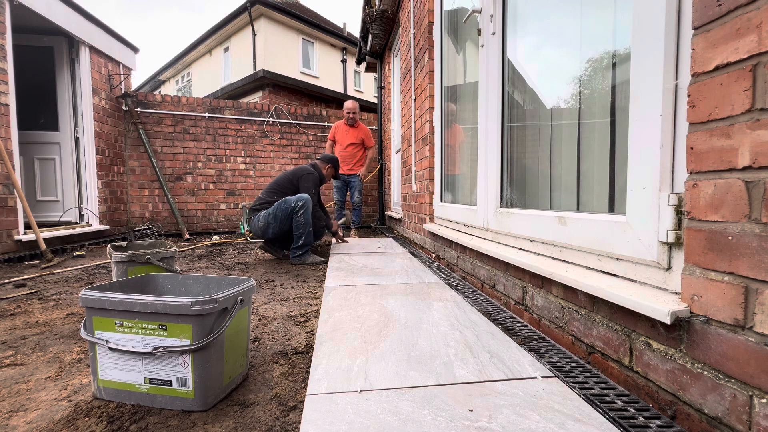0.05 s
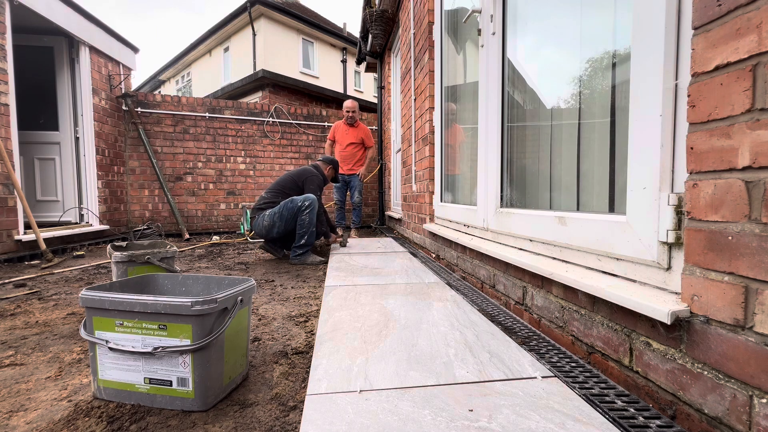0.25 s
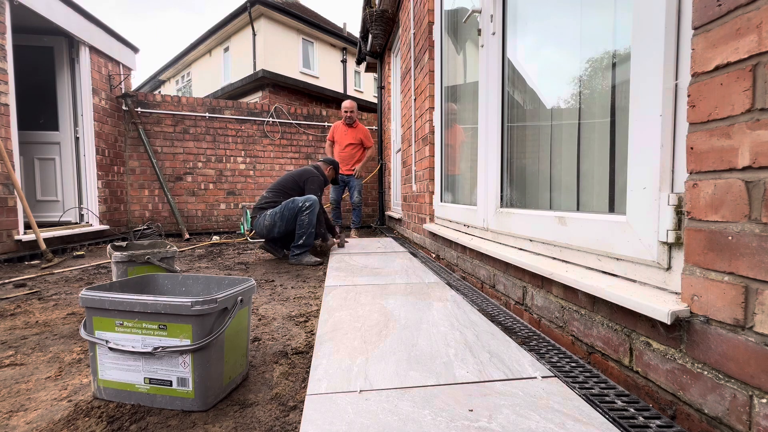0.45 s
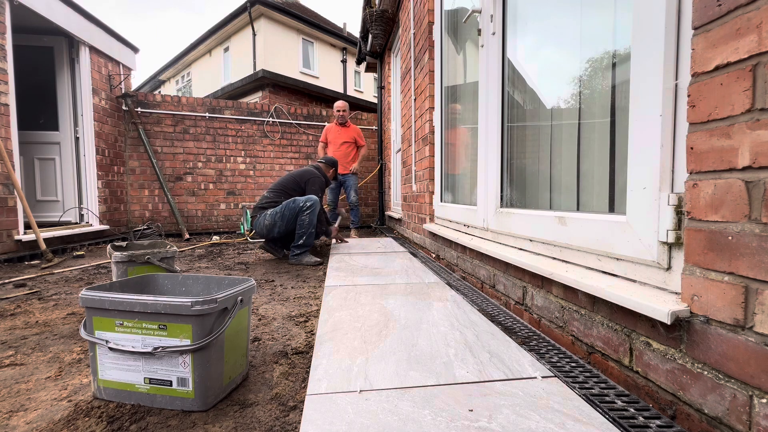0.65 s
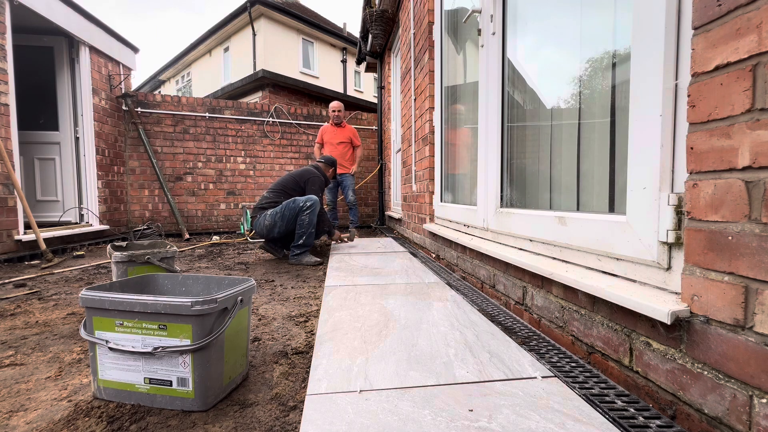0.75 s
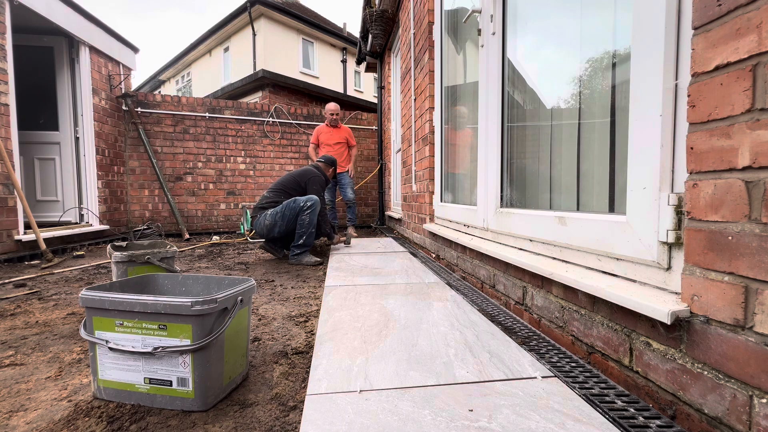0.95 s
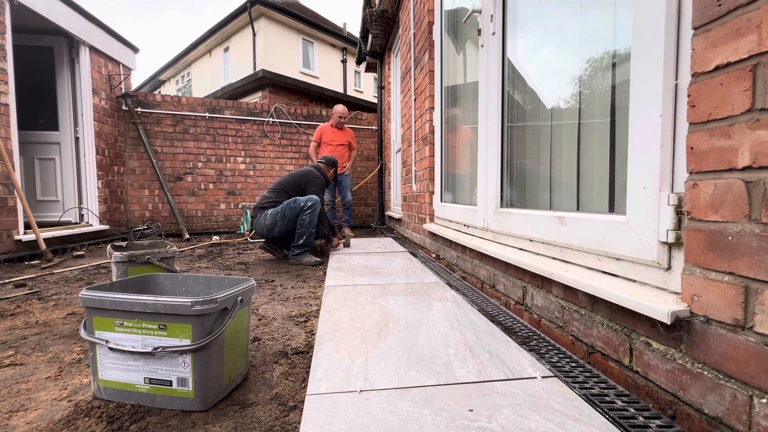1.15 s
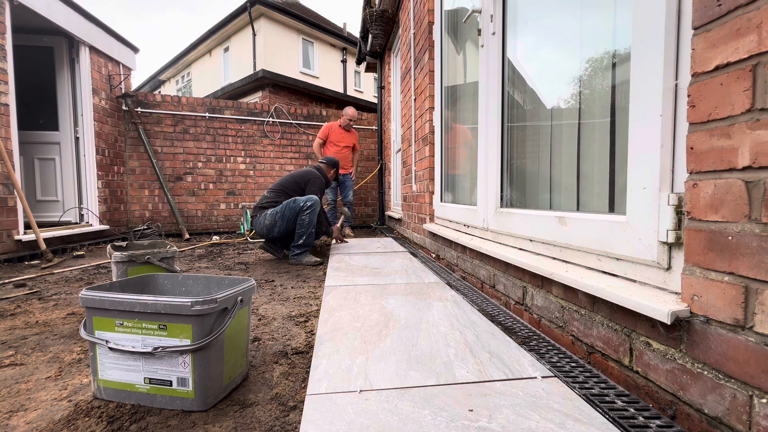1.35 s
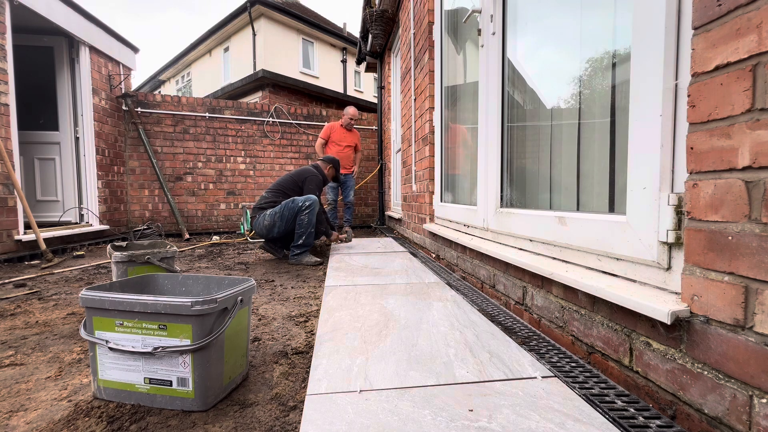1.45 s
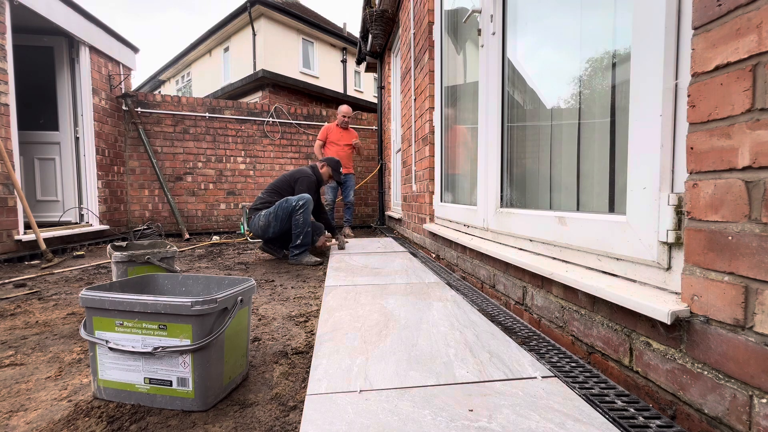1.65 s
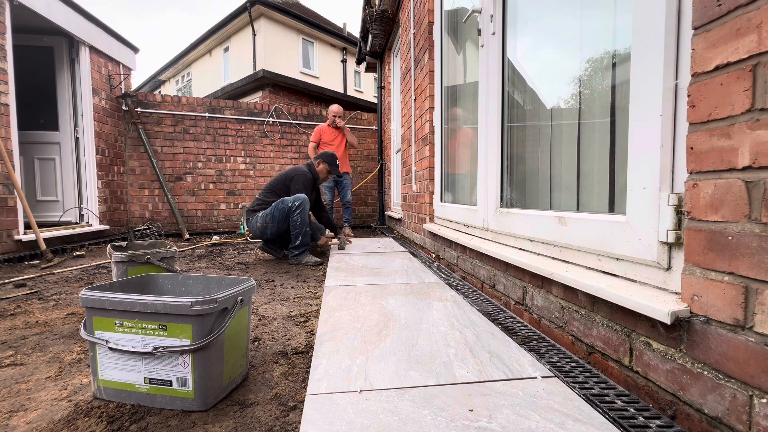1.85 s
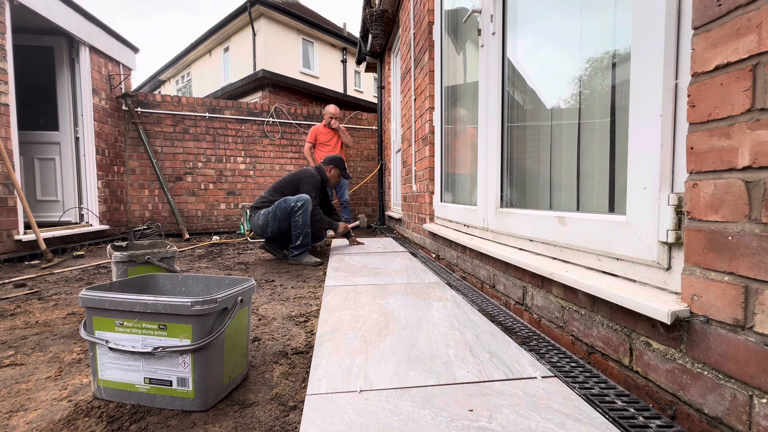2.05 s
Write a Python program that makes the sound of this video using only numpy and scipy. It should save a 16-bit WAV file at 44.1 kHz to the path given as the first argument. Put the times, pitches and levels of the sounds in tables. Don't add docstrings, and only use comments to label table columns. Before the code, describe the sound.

A rubber mallet strikes a large paving tile with dull, snappy knocks at about 0.22, 0.45, 0.69, 0.92, 1.15 and 1.37 seconds, then a soft touch at 1.64. Each has a short ring, low boom and quick wall echoes, slightly right. Grit scrapes faintly near 0.33, 0.62 and 1.86. Quiet town hush and machine hum persist, hum peaking near 1.74; a distant blackbird whistles from 1.8.

```python
import sys
import numpy as np
from scipy import signal
from scipy.fft import rfft, irfft, next_fast_len
from scipy.io import wavfile
from scipy.ndimage import uniform_filter1d, map_coordinates

SR = 44100
rng = np.random.default_rng(int(sys.argv[2]) if len(sys.argv) > 2 else 0)


def amplitude_ratio(level_db):
    exponent = np.asarray(level_db, float) / 20
    return 10 ** exponent


def inscribe(sig):
    pcm = np.round(np.clip(np.atleast_2d(sig).T, -1, 1) * 32767)
    wavfile.write(sys.argv[1], SR, pcm.astype(np.int16))


N = 92610
BLOW_TIME_S = np.arange(SR // 2) / SR


def unit(x):
    return x / np.sqrt(np.mean(x ** 2) + 1e-20)


def along(points, hz):
    point_hz, value = np.transpose(points)
    return np.interp(np.log(hz + 1), np.log(point_hz + 1), value)


def filtered(x, response):
    size = next_fast_len(x.shape[-1] + 8192)
    spectrum = rfft(x, size) * response(np.fft.rfftfreq(size, 1 / SR))
    return irfft(spectrum, size)[..., :x.shape[-1]]


def noise(colour, shape):
    return unit(filtered(rng.standard_normal(shape), lambda hz: amplitude_ratio(along(colour, hz))))


def wobble(rate):
    points = rng.standard_normal(int(N * rate / SR) + 4)
    return map_coordinates(points, [np.arange(N) * rate / SR])


def add(track, start_s, x):
    part = track[..., round(start_s * SR):][..., :x.shape[-1]]
    part += x[..., :part.shape[-1]]


def sides(table, lag_s, hz):
    half = amplitude_ratio(along(table, hz) / 2) * np.exp(1j * np.pi * hz * lag_s)
    return np.array([half, 1 / half])


def yard_tail(colour):
    # pitch_hz, fade_s
    fade_times = [(60, 0.61), (160, 0.39), (420, 0.12), (1100, 0.22), (2900, 0.23), (7700, 0.15),
                  (15000, 0.18)]
    alike, start_s = 0.2, 0.0083
    common, left, right = rng.standard_normal((3, SR // 2))
    pair = np.sqrt(alike) * common + np.sqrt(1 - alike) * np.array([left, right])
    hz, t, z = signal.stft(pair, SR, nperseg=256)
    level_db = colour(hz)[:, None] - 60 * t / along(fade_times, hz)[:, None]
    tail = signal.istft(z * amplitude_ratio(level_db), SR, nperseg=256)[1][:, :SR // 2]
    return tail * (1 - np.exp(-BLOW_TIME_S / start_s))


def hush():
    # pitch_hz, level_db
    colour = [(15, -26), (40, -16), (120, -2), (300, -14), (500, -14.5), (720, -11), (1100, -18),
              (2100, -20.5), (4000, -33), (16000, -39.5)]
    # pitch_hz, likeness (-1 to 1)
    likeness = [(60, 0.63), (250, 0.27), (640, -0.24), (1500, 0.01)]
    z = signal.stft(rng.standard_normal((2, N)), nperseg=512)[2]
    patches = uniform_filter1d(rng.standard_normal(z.shape[1:]), size=6, axis=0)
    patches = uniform_filter1d(patches, size=10, axis=1)
    pair = signal.istft(z * amplitude_ratio(1.6 * unit(patches)), nperseg=512)[1][:, :N]

    def width(hz):
        turn = np.arccos(np.clip(along(likeness, hz), -1, 1)) / 2
        return amplitude_ratio(along(colour, hz)) * np.array([np.cos(turn), np.sin(turn)])

    mid, side = filtered(pair, width)
    return amplitude_ratio(-61.5) * unit(np.array([mid + side, mid - side]))


def machine_hum():
    # pitch_hz, level_db
    tones = [(307, -80), (614, -79), (676, -70), (737, -74), (1244, -86), (1475, -84)]
    # time_s, level_db
    load = [
        (0, -7),
        (.12, 0),
        (.5, 2),
        (1.5, -3.5),
        (1.68, 5.5),
        (1.74, 11.5),
        (1.8, 3.5),
        (1.85, 1),
        (2.1, 3),
    ]
    t = np.arange(N) / SR
    hum = np.zeros((2, N))
    for hz, db in tones:
        swell = amplitude_ratio(db + 6.5 + 2 * wobble(7.47))
        phase = 0.5 * wobble(10) + [[0], [2.2]]
        hum += swell * np.sin(2 * np.pi * hz * t + phase)
    return hum * amplitude_ratio(np.interp(t, *np.transpose(load)))


def air():
    # pitch_hz, level_db
    balance = [(60, -11), (180, -11.5), (550, -5), (1650, -3), (4970, -3), (15000, 0)]
    return filtered(hush() + machine_hum(), lambda hz: sides(balance, 0, hz))


def bird():
    # start_s, length_s, from_hz, to_hz, level_db
    whistles = [
        (1.812, .05, 2110, 2050, -69),
        (1.89, .045, 1890, 2000, -68),
        (1.96, .04, 1760, 1680, -71),
        (2.0, .035, 1680, 1820, -72),
        (2.018, .05, 2020, 2190, -65),
        (2.058, .06, 2150, 2010, -64),
    ]
    song = np.zeros(N)
    for start_s, length_s, from_hz, to_hz, db in whistles:
        u = np.arange(round(length_s * SR)) / (length_s * SR)
        pitch_hz = from_hz + (to_hz - from_hz) * u + 25 * wobble(93)[:len(u)]
        whistle = np.sin(2 * np.pi * np.cumsum(pitch_hz) / SR)
        add(song, start_s, amplitude_ratio(db) * np.sin(np.pi * u) * whistle)
    tail = yard_tail(np.zeros_like)
    tail = tail / np.linalg.norm(tail[0])
    return song + amplitude_ratio(1) * signal.fftconvolve(song[None], tail, axes=1)[:, :N]


def grit():
    # start_s, level_db, rise_s, fade_s (to -60 dB), centre_hz
    puffs = [
        (0.038, -62, 0.0033, .04, 7000),
        (0.328, -57, .04, 0.42, 4670),
        (0.622, -53.5, 0.005, 0.14, 3120),
        (1.596, -63, 0.006, 0.13, 3900),
        (1.64, -76, 0.0048, 0.027, 4970),
        (1.862, -53, 0.0029, 0.058, 1270),
        (1.864, -69.5, 0.0034, .06, 5580),
    ]
    out, t = np.zeros((2, N)), np.arange(SR // 4) / SR
    for start_s, db, rise_s, fade_s, hz in puffs:
        colour = [(hz / 4, -18), (hz, 0), (hz * 2.3, -8), (20000, -30)]
        grains = noise(colour, (2, len(t))) * amplitude_ratio(wobble(386)[:len(t)])
        add(out, start_s, amplitude_ratio(db - 60 * t / fade_s) * (1 - np.exp(-t / rise_s)) * grains)
    return out


def ring(hz, db, fade_s, t, attack_s=0.0003, waver=0):
    t = np.maximum(t, 0)
    tone = np.sin(2 * np.pi * hz * t + waver)
    return amplitude_ratio(db - 60 * t / fade_s) * tone * (1 - np.exp(-t / attack_s))


def struck(modes, late_s):
    total = 0
    for hz, db, fade_s in modes:
        start_s = late_s + 0.0009 * np.sqrt(1000 / hz)
        total = total + ring(hz, db + 1.2 * rng.normal(), fade_s, BLOW_TIME_S - start_s)
    return total


def brightness(crack_db, hz):
    return crack_db * hz / (hz + 3000)


def walls(hz):
    # delay_s, left_db, right_db
    echoes = [
        (.0026, -25.5, -11.5),
        (.007, -15.5, -21.5),
        (.019, -15, -15.5),
    ]
    total = 1
    for delay_s, left_db, right_db in echoes:
        total = total + amplitude_ratio([[left_db], [right_db]]) * np.exp(-2j * np.pi * hz * delay_s)
    return total


def tile():
    # pitch_hz, level_db, fade_s (to -60 dB)
    tile_modes = [(154.2, -2.5, 0.11), (177.3, 2.5, 0.15), (197.2, -10, .07), (247.4, -3.5, 0.055),
                  (355.3, -6, 0.055), (417.4, -0.5, 0.046), (486.5, -18, 0.019), (543, 9, 0.052),
                  (584, -13.5, 0.1), (671.3, 9, 0.027), (877, -3.5, .05), (1022, -2.5, .06)]
    return amplitude_ratio(-10) * filtered(struck(tile_modes, 0.0014), walls)


def ping(crack_db):
    # pitch_hz, level_db, fade_s (to -60 dB)
    ping_modes = [(1000, 4.5, .026), (1340, -1, .018), (800, -4, .022), (2250, -10, .012), (2800, -13, .01)]
    pair = struck(ping_modes, np.array([[0.00029], [0]]))
    return filtered(pair, lambda hz: amplitude_ratio(brightness(crack_db, hz)))


def crack(crack_db):
    # pitch_hz, level_db
    colour = [(900, -50.5), (2000, -6.5), (2600, 1.5), (3400, -12), (4700, -4), (5400, -26), (6300, -5),
              (16400, -28.5)]
    rise_s, hold_s, fade_s, echo_s = 0.0008, 0.0015, 0.004, 0.0011
    t = BLOW_TIME_S
    shape = np.clip(t / rise_s, 0, 1) * amplitude_ratio(-60 * np.maximum(t - hold_s, 0) / fade_s)
    burst = amplitude_ratio(-7 + crack_db) * shape * noise(colour, len(t))
    return burst + np.array([[0], [1]]) * amplitude_ratio(-6) * np.roll(burst, round(echo_s * SR))


def booms(boom_db):
    # pitch_hz, level_db, fade_s (to -60 dB), start_s, extra_right_lag_s
    boom_modes = [(62, -23.5, 0.24, 0.0094, .003), (93.5, -14.5, 0.4, 0.0036, 0.0012),
                  (149.16, -12, 0.4, .004, 0.00022), (245.8, -9, 0.24, .003, 0.00033)]
    total = 0
    for hz, db, fade_s, start_s, lag_s in boom_modes:
        t = BLOW_TIME_S - start_s - lag_s * np.array([[0], [1]])
        waver = 0.45 * wobble(14)[:len(BLOW_TIME_S)]
        total = total + ring(hz, db + boom_db + rng.normal(), fade_s, t, 0.003, waver)
    return total


def wash(crack_db):
    # pitch_hz, level_db (per Hz)
    colour = [(120, -22), (200, -4), (424, -8.5), (558, -3.5), (3070, -34.5), (5230, -37), (9580, -37),
              (13800, -51.5), (16000, -94.5)]
    rms = np.sqrt(np.mean(amplitude_ratio(2 * along(colour, np.linspace(0, SR / 2, 500)))))
    tail = yard_tail(lambda hz: along(colour, hz) + 0.24 * brightness(crack_db, hz))
    return amplitude_ratio(-10) * tail / rms


def lead_in(crack_db, lead_s):
    # pitch_hz, level_db
    colour = [(50, -18.5), (150, -6), (600, -9.5), (1100, -0.5), (2300, -12.5), (3200, -15), (9000, -20.5),
              (16000, -39)]
    t, after_s = BLOW_TIME_S, 0.012
    hiss = filtered(noise(colour, (2, len(t))), lambda hz: amplitude_ratio(brightness(crack_db, hz)))
    swell = np.clip(t / lead_s, 0, 1) - np.clip((t - lead_s) / after_s, 0, 1)
    return amplitude_ratio(2) * np.sin(np.pi / 2 * swell) ** 1.15 * hiss


def mallet():
    # level_db, crack_db, boom_db
    blows = [
        (-8, -5.5, -4.5),
        (-8.5, 0.5, -0.5),
        (-9, 0, -0.5),
        (-8.5, -1, -1.5),
        (-9, -7, -3),
        (-8, -4.5, -1.5),
        (-23, -30.5, -2.5),
    ]
    blow_starts = [.2161, .4547, .6877, .9170, 1.1464, 1.3715, 1.6402]
    ping_levels = [-13, -11, -11, -10, -14, -9.5, -23]
    lead_in_levels = [-25, -31, -31, -33, -24, -36, -52]
    lead_in_times = [.025, .022, .022, .022, .029, .021, .006]
    # pitch_hz, level_db
    balance = [(40, -6), (90, -4.5), (200, -9), (400, -9), (700, -6), (1200, 0), (2500, -1.5), (9000, -4)]
    out = np.zeros((2, N))
    each_blow = zip(blow_starts, ping_levels, lead_in_levels, lead_in_times, blows)
    for start_s, ping_db, lead_in_db, lead_s, (db, crack_db, boom_db) in each_blow:
        body = tile() + crack(crack_db) + booms(boom_db) + wash(crack_db)
        add(out, start_s, amplitude_ratio(db) * body + amplitude_ratio(ping_db) * ping(crack_db))
        add(out, start_s - lead_s, amplitude_ratio(lead_in_db) * lead_in(crack_db, lead_s))
    return filtered(out, lambda hz: sides(balance, 0.000551, hz))


def scene():
    return air() + bird() + grit() + mallet()


def roll_off(x):
    return signal.sosfilt(signal.butter(12, 16500, fs=SR, output="sos"), x)


def record(dry):
    low_cut_hz, limit, top_hz = 60, 0.95, 16300
    low_cut = filtered(dry, lambda hz: (1j * hz / (low_cut_hz + 1j * hz)) ** 2)
    held = low_cut / (1 + np.abs(low_cut / limit) ** 4) ** (1 / 4)
    mix = filtered(held, lambda hz: 1 / (1 + (hz / top_hz) ** 60))
    return roll_off(mix)


dry = scene()
out = record(dry)
inscribe(out)
```